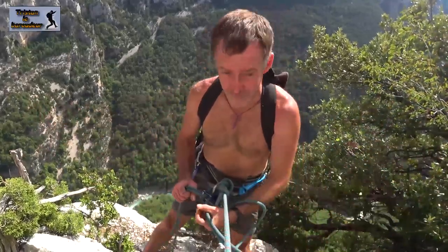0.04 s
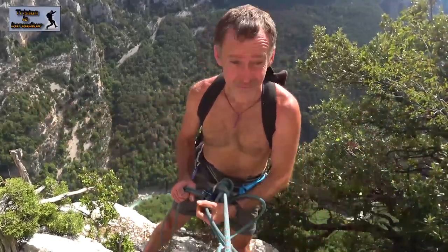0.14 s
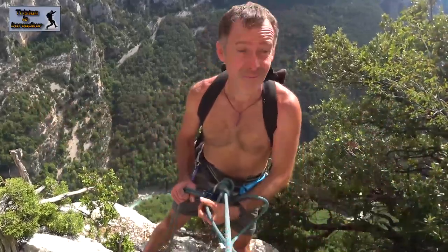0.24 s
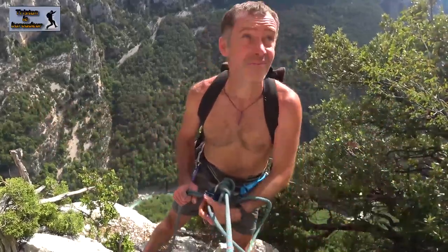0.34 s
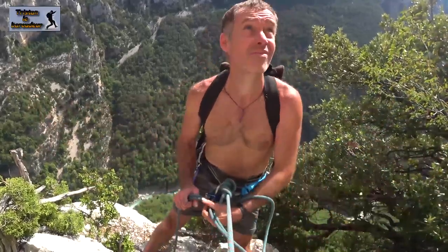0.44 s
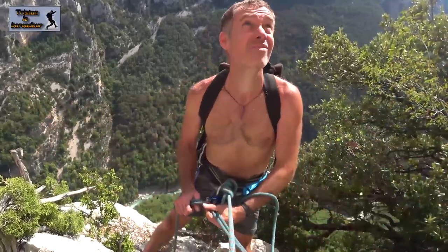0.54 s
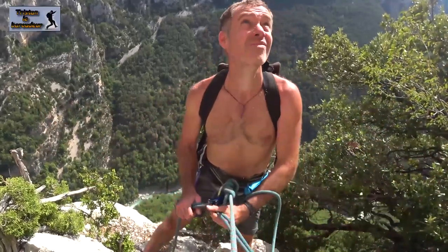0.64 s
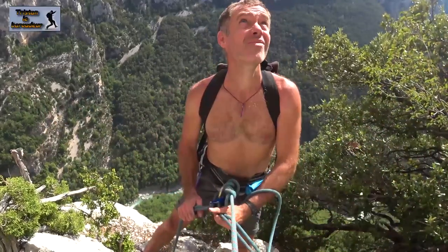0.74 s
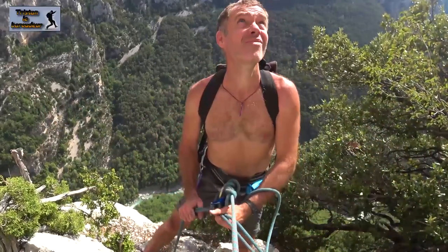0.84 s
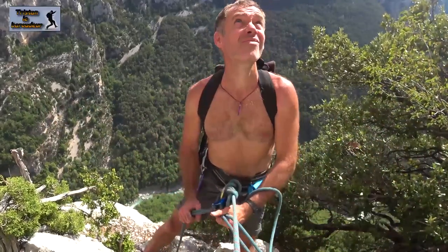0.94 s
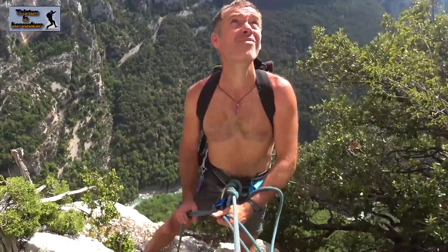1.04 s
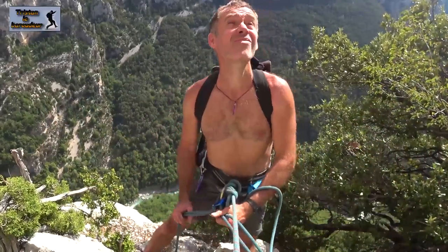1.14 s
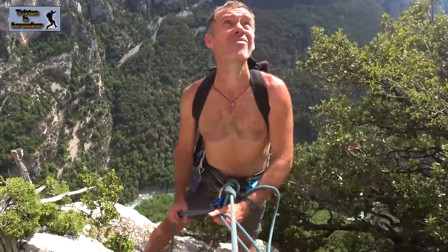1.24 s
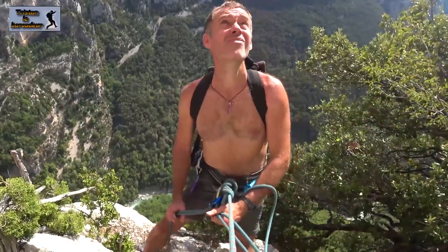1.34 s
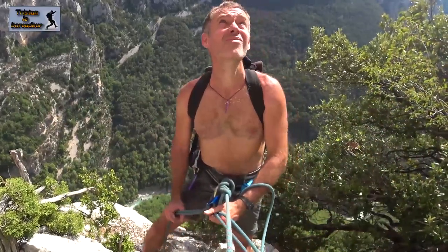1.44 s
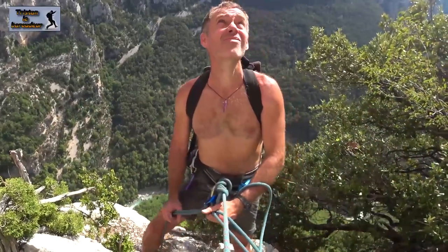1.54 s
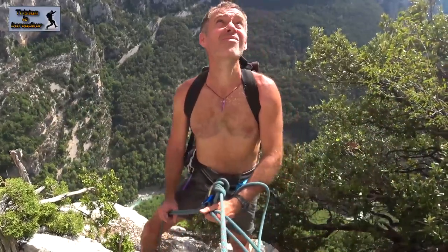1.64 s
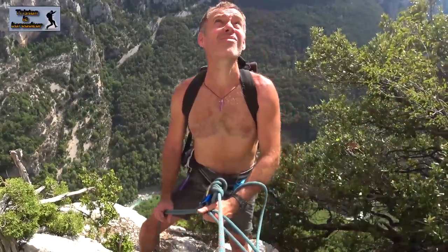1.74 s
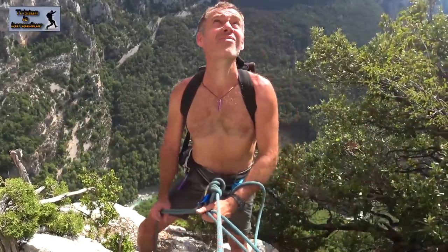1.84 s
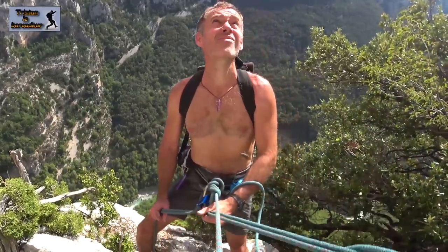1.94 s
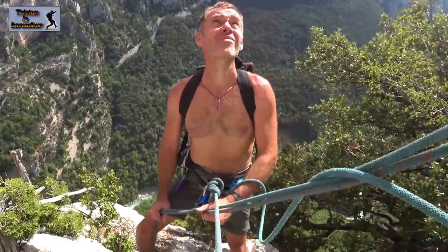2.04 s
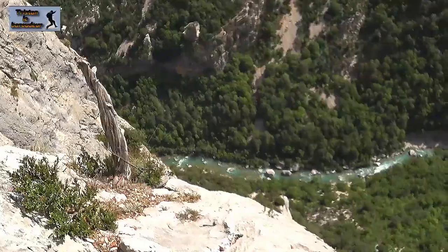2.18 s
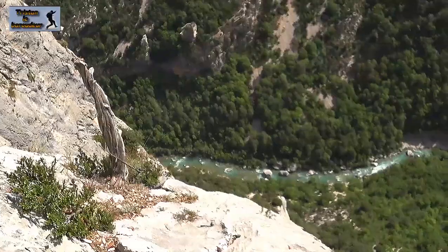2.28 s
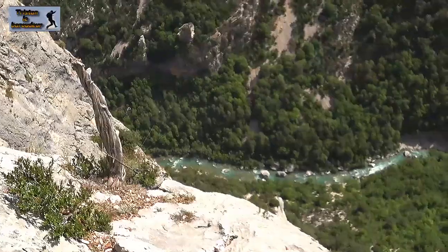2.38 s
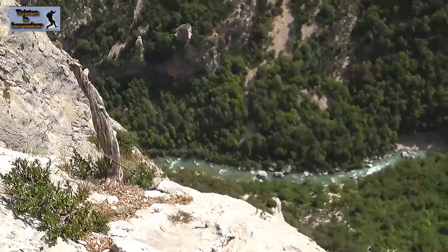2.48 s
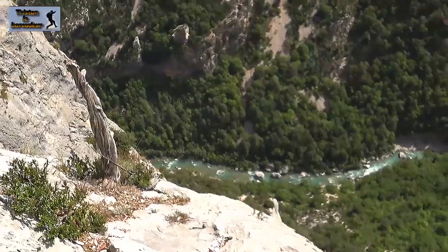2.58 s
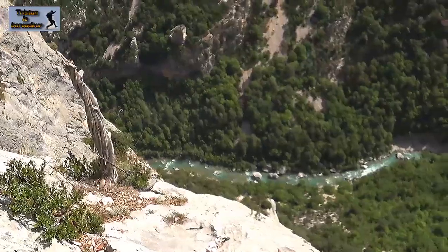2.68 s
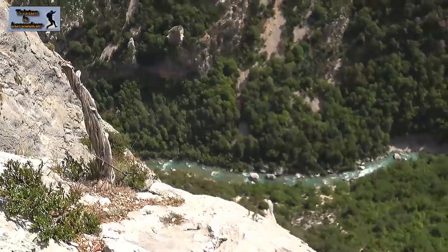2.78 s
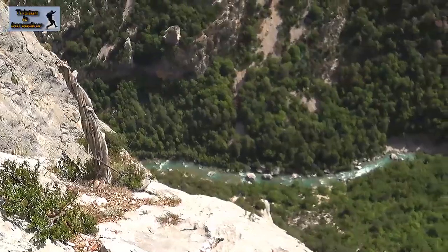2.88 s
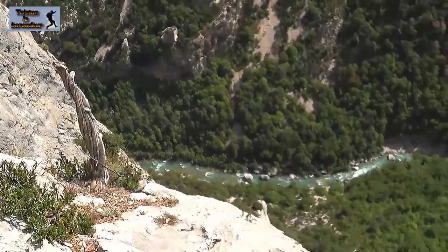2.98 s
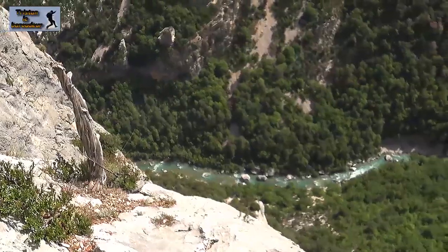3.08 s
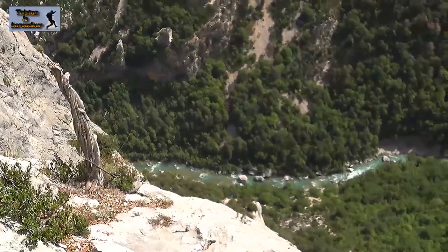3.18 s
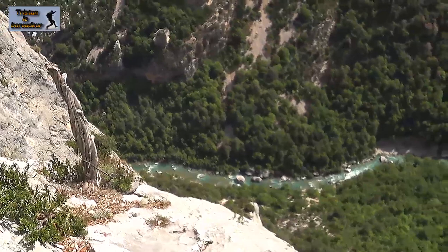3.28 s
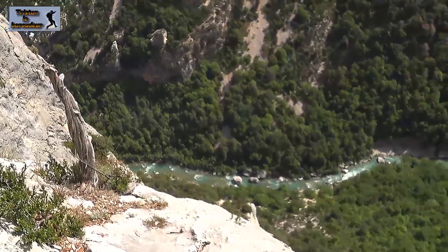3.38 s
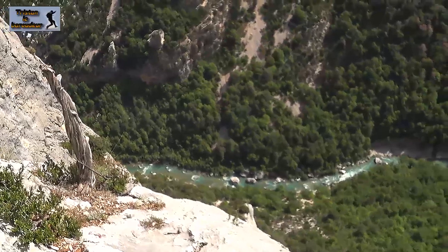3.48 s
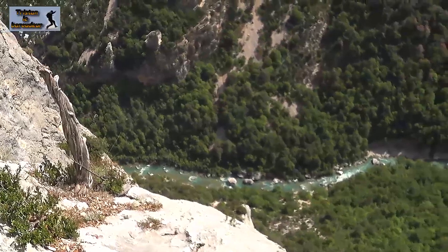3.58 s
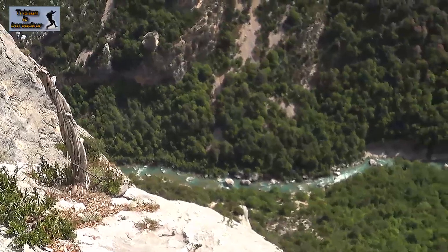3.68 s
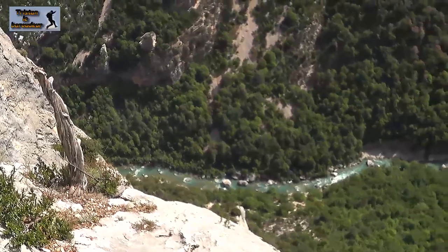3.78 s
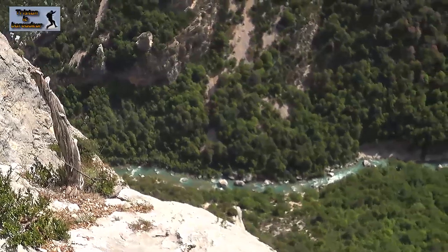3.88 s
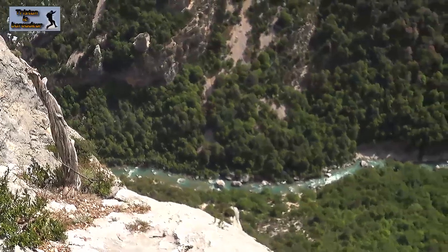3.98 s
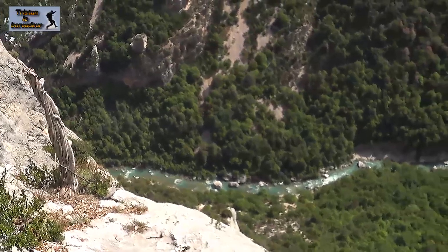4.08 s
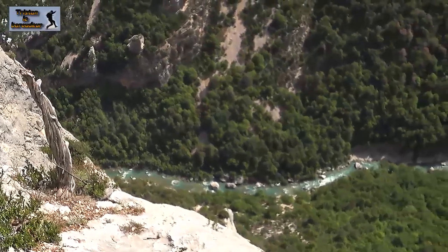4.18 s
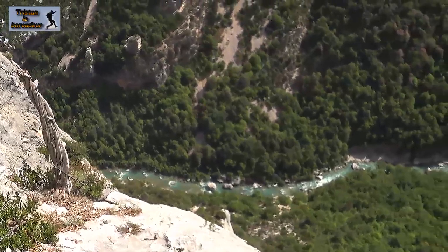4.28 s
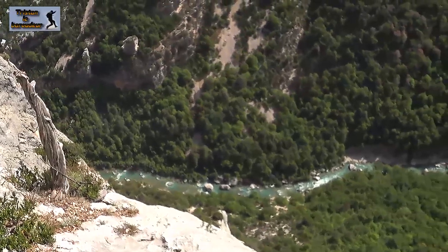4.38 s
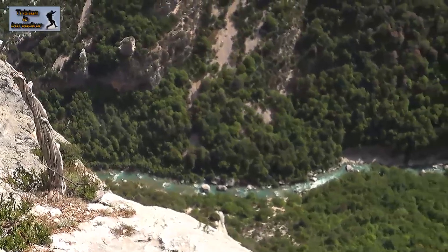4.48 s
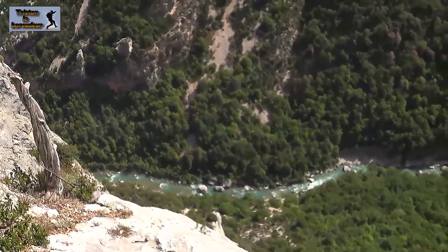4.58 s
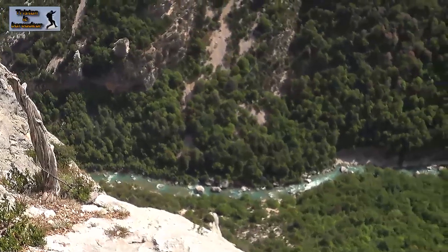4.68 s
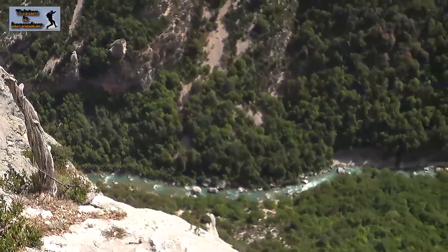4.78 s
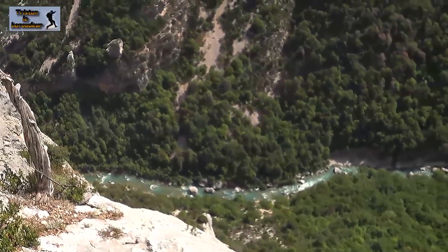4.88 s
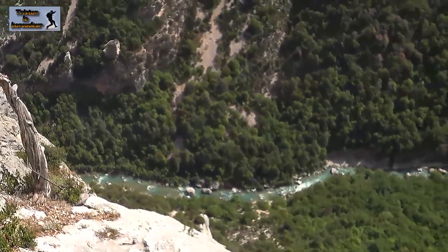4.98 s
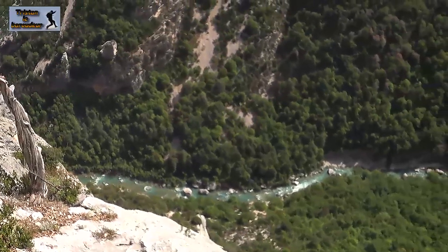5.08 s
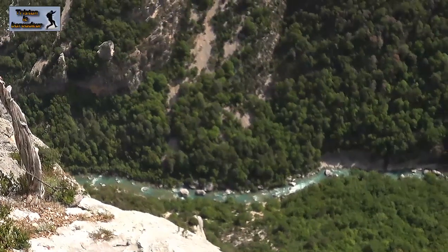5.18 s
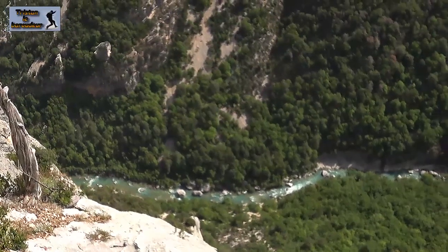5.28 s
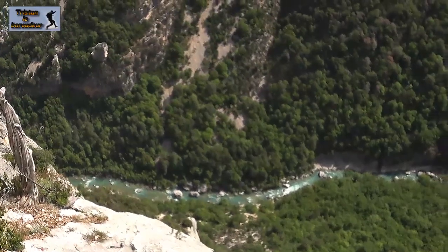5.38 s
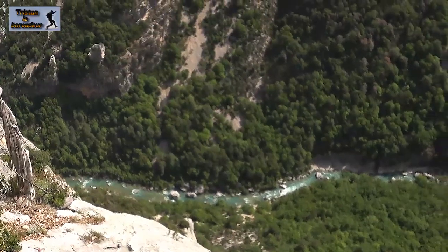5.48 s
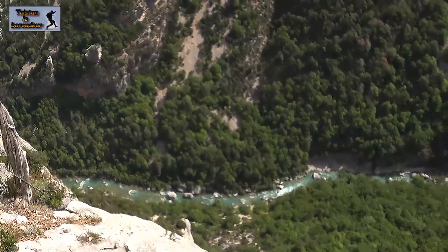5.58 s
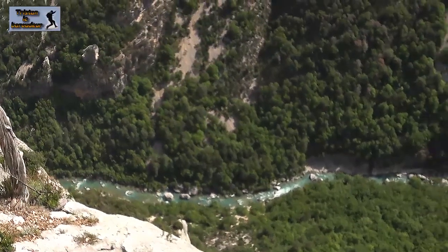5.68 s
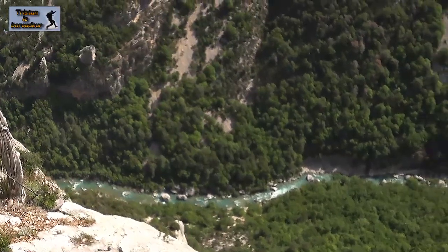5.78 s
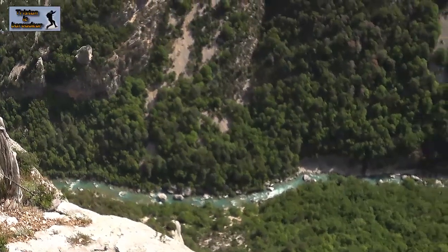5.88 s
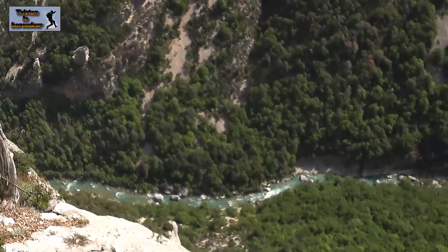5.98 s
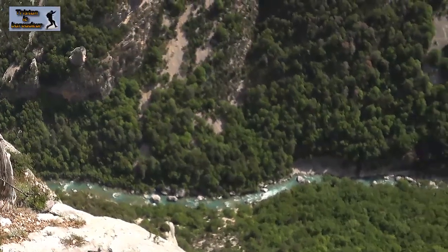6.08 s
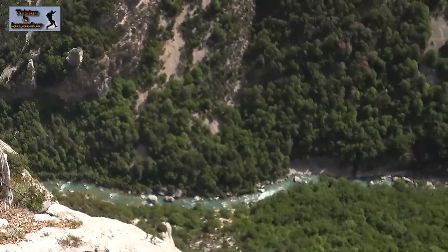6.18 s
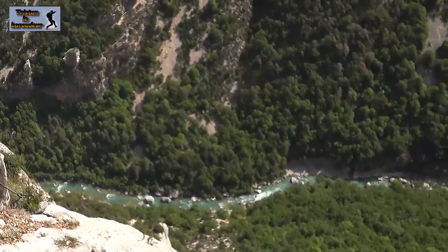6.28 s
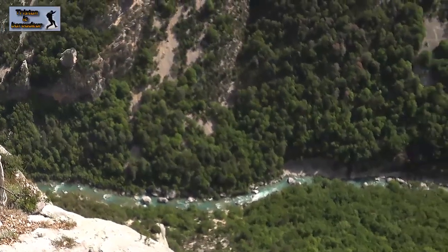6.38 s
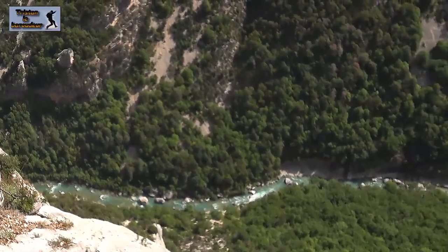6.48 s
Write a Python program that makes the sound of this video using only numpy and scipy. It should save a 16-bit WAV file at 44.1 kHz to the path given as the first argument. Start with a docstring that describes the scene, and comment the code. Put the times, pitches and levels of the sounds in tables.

```python
"""Belay above a river gorge

A climber feeds rope close to a small camera. Carabiners and other hardware knock together, damped by
rope and hands; the rope's sheath swishes with each pull, and nudges on the camera thump softly.
The river hisses far below. At a cut, its wash abruptly thins and the low rumble of air drops."""
import sys
import numpy as np
from scipy import signal
from scipy.fft import rfft, irfft
from scipy.io import wavfile

SR = 44100
rng = np.random.default_rng(int(sys.argv[2]) if len(sys.argv) > 2 else 0)


def generate_wav(signal):
    """Clip the signal to [-1, 1] and save it as 16-bit WAV at the path in sys.argv[1]."""
    frames = np.transpose(np.atleast_2d(signal))
    scaled = np.clip(frames, -1, 1) * 32767
    pcm = np.round(scaled).astype(np.int16)
    wavfile.write(sys.argv[1], SR, pcm)


N = 287884
TIME = np.arange(N) / SR
CUT_S = 2.21  # the river wash abruptly thins and the air rumble drops

# Metal meeting metal. Each row: start in seconds, piece, strength in dB,
# free ring over that strength in dB, weight of the blow in dB.
BLOWS = [ (.030, "sling clip", -51.5, 9, 8), (0.199, "sling clip", -50.5, -2, 12),
         (.3892, "quickdraw", -29, 5, -14), (0.3993, "locker", -20, 11, -5), (0.401, "locker", -14, -21, 4),
         (0.4402, "steel link", -25, 0.5, 11.5), (0.4482, "locker", -33, -19, 2),
         (.501, "buckle", -47, 2, 10), (.580, "buckle", -46.5, -11, 16),
         (0.6143, "quickdraw", -21.5, -1.5, -10), (1.651, "steel link", -40.5, 3.5, 13.5),
         (2.0352, "steel link", -36.5, -12, 14), (2.092, "locker", -23, -22, 5),
         (2.1616, "belay plate", -28, 6.5, 11), (2.2175, "anchor", -31.5, -21, 10),
         (2.312, "ring", -52.5, 7, 3), (2.367, "screw sleeve", -25.5, -19, 6), (2.378, "ring", -44, 9, 7),
         (2.4014, "screw sleeve", -19, -23, 6.5), (2.406, "screw sleeve", -30, -3, -11),
         (2.446, "nut", -29.5, 3, 4), (2.462, "anchor", -36.5, -22, 5), (2.493, "belay plate", -47, 6, 6),
         (2.658, "anchor", -32.5, -13, 10.5), (2.818, "anchor", -40.5, -18, 10),
         (2.903, "gate", -40, -15, 0), (2.916, "ring", -48, 1, 14), (3.065, "anchor", -41, -8, 10),
         (3.259, "bolt hanger", -41, -6, -4), (3.298, "bolt hanger", -44, -11, 4),
         (3.334, "belay plate", -51, 5, 12), (3.8586, "gate", -21.5, -1.5, 2),
         (3.8637, "gate", -30, -11, 4), (3.8755, "gate", -32, -4, 8.5), (3.932, "anchor", -45, -5, 17),
         (4.385, "anchor", -52, -15, 22), (4.443, "anchor", -44, -4, 3), (4.572, "anchor", -57.5, 11, 23),
         (4.91, "screw sleeve", -45, -17, 10), (5.027, "belay plate", -52, 4.5, 0),
         (5.161, "nut", -50, -14, 19), (5.18, "nut", -47, -11, 19), (5.276, "ring", -46, -24, 11),
         (6.158, "bolt hanger", -47, -14, 14), (6.167, "belay plate", -55, 11.5, 0),
         (6.395, "belay plate", -59, 12.5, 0), (6.517, "ring", -56.5, 4.5, 25), ]
def hardware(ledge_db=-22, ledge_t60=0.2):
    """Climbing gear knocks together, with a faint scatter from the rock ledge."""
    direct = np.zeros(N)
    for start, *blow in BLOWS:
        add(direct, start, strike(*blow))
    t = np.arange(SR // 3) / SR
    ledge = burst(t, ledge_t60) * (t > .005)
    scatter = signal.fftconvolve(direct, ledge / np.linalg.norm(ledge))[:N]
    return direct + amp(ledge_db) * scatter


# How each piece hangs. Each entry: rattle offset in dB, treble offset in dB.
HANGING = {"locker": (-13, -2.3), "steel link": (-13.5, 1), "sling clip": (1, 1), "quickdraw": (-8.5, -2.5),
           "belay plate": (-16, 5), "buckle": (0, -9), "ring": (2.6, -1.1), "anchor": (-3, 1),
           "bolt hanger": (0, -2), "gate": (-2, -2), "screw sleeve": (-5.5, -1.5), "nut": (-6.5, -1)}
# A second set of metal modes that sounds with the struck piece.
# Each entry: name of the mode set, its level over the piece's own ring in dB.
ADDED_RING = {"anchor": ("belay plate", 1), "bolt hanger": ("belay plate", -2), "quickdraw": ("locker", -7),
              "sling clip": ("locker", 1)}
def strike(piece, strength_db, free_db, weight_db, rattle_per_ring=0.36, top_loss_per_weight=0.25):
    """One blow: a freer piece rings and rattles more; a heavier blow stays in contact and is duller."""
    loose_db, top_db = HANGING[piece]
    ring_db = strength_db + free_db
    rattle_db = strength_db + loose_db + rattle_per_ring * free_db
    top_db -= top_loss_per_weight * weight_db
    sound = clink(piece, strength_db, ring_db, rattle_db, weight_db, top_db)
    if piece in ADDED_RING:  # ring only, no tick or rattle
        mode_set, share_db = ADDED_RING[piece]
        sound -= clink(mode_set, -np.inf, ring_db + share_db, -np.inf)
    return sound


# The modes of each piece. Each row: frequency in Hz, relative level in dB, t60 in seconds.
METAL_MODES = { "locker": [(2000, -20.5, 0.099), (2580, -9.5, 0.017), (3058, -39, 0.055), (3310, -6, 0.029),
               (3590, -2.5, 0.027), (4420, -28, 0.014), (4500, 0, 0.018), (5080, 3, 0.033),
               (5700, -9, 0.04), (6310, 5.5, 0.022), (7570, -11, .025), (8160, -7, 0.038),
               (8750, -20, 0.0492), (10800, -10.5, 0.052)], "steel link": [(1313, -9, 0.064),
               (1900, -45, 0.045), (2524, -22, 0.038), (2480, 5, 0.031), (3500, 3, 0.028), (5030, 3, 0.023),
               (5530, 0, 0.029), (6520, -15, 0.045), (7140, -5, 0.044), (8000, -4, .04), (10200, -15, .04)],
               "sling clip": [(3800, -8, .06), (5140, 33, 0.057), (5700, -27, .05), (5650, 14, .05),
               (8717, -5, .05), (9370, 2, .04), (10950, -7, 0.072), (12300, 0, .04)],
               "quickdraw": [(3600, -30, 0.1), (5200, -5, 0.023), (5500, -6, 0.031), (7060, -25, 0.04),
               (7640, -16, 0.051), (9100, -2, 0.031), (9350, -12, 0.062), (9800, 0, 0.04),
               (11070, 4, 0.033), (12150, -12, .04), (13710, -19, .06)], "belay plate": [(1820, -25, 0.044),
               (3644, -4, 0.04), (7640, -31, 0.084)], "buckle": [(3190, 5, 0.14), (3500, -14, .04),
               (3640, -9, .06), (6350, -15, .06)], "ring": [(5200, -4, 0.03), (8730, 0, 0.099),
               (10430, -7.5, 0.14), (11800, -5, 0.061), (13650, -9, .05), (15580, -8, .05)],
               "anchor": [(3700, -9, 0.1), (5290, 3, 0.15), (5270, 10, 0.067), (7200, 0, 0.092),
               (7400, -3, 0.045), (8800, -13, .05), (11690, -6, 0.086), (12050, -9, .07)],
               "bolt hanger": [(3470, -4, 0.25), (3740, -10, 0.12), (5080, -20, 0.22), (7100, -6, 0.18),
               (8840, -10, 0.046), (11300, -24, 0.087)], "gate": [(4650, -18, 0.037), (4780, -4.5, .045),
               (4900, 0, 0.045), (5070, -1, 0.056), (5330, -17, .07), (5460, -14, 0.046), (8100, -7, 0.059),
               (8130, -1.5, 0.026), (11750, -12, 0.079), (12040, -8, 0.15), (15150, -8, .04),
               (15400, -3, .04)], "screw sleeve": [(3150, -37, .04), (3880, -26, .025), (5000, -8, .02),
               (8200, -4, .045), (7940, -4, 0.039), (10400, -14, .05), (11850, -7, 0.098)],
               "nut": [(2180, -9, 0.07), (4290, 8, 0.02), (4340, -9, .04), (4930, -7, 0.025),
               (8400, -18, .03), (9650, -11, 0.09), (11700, -7, 0.1)], }
# The tone of metal in contact. Each row: frequency in Hz, gain in dB.
CONTACT_EQ = [(90, -64), (350, -23), (900, -8), (1500, -9.5), (2500, -4), (5000, -1), (8000, 0.5),
              (12000, -3), (13200, -5.5), (16000, -14)]
def clink(piece, tick_db, ring_db, rattle_db, low_db=0, top_db=0, body_db=11, body_width_hz=420):
    """A hard tick, the ringing modes of the piece, and a short dense rattle against nearby gear."""
    t = np.arange(SR // 4) / SR
    hz, db, t60 = np.transpose(METAL_MODES[piece])[:, :, None]
    strength = amp(db) / np.linalg.norm(amp(db))
    sign = np.cos(np.pi * np.arange(len(hz)))[:, None]  # alternate modes swing opposite ways
    modes = sign * strength * amp(-60 * t / t60) * np.sin(2 * np.pi * hz * t)
    ring = np.sqrt(2) * amp(ring_db) * modes.sum(0)
    tick = amp(tick_db + 5.5) * burst(t, t60=0.0073)
    rattle = amp(rattle_db + 4) * burst(t, t60=0.095)
    # heavy blows carry more lows, glancing ones more top
    weight_eq = [(2600, low_db), (4600, 0), (7500, 0), (11500, top_db)]

    def contact_db(f):
        """While the pieces touch, their modes are damped into broad humps."""
        humps = (strength / (1 + (2 * (f - hz) / body_width_hz) ** 2)).sum(0)
        body = unit(np.sqrt(1 + amp(body_db) ** 2 * humps))
        return eq_at(CONTACT_EQ, f) + eq_at(weight_eq, f) + 20 * np.log10(body)

    return ring + colour(tick + rattle, contact_db)


# Spells of swaying. Each row: start and end in seconds, piece, touches per second, ring level in dB.
SWAYS = [ (0.038, .10, "quickdraw", 60, -51), (0.461, .57, "buckle", 38, -58),
         (.65, .72, "locker", 60, -52), (2.535, 2.78, "anchor", 10, -61), (3.27, 3.42, "anchor", 26, -60),
         (3.94, 4.10, "anchor", 32, -69), (5.04, 5.12, "belay plate", 40, -62),
         (5.977, 6.45, "belay plate", 36, -59), ]
def jingles(spread_db=4):
    """Loose gear sways on its slings and touches lightly at uneven moments."""
    out = np.zeros(N)
    for start, end, piece, per_s, db in SWAYS:
        for slot in np.arange(start, end, 1 / per_s):
            level = db + spread_db * rng.uniform(-1, 1)
            onset = slot + rng.random() / per_s
            add(out, onset, clink(piece, tick_db=level - 5, ring_db=level, rattle_db=level - 5))
    return out


# The rubbing sheath. Each row: frequency in Hz, relative level in dB.
SHEATH_SPECTRUM = [(500, -26), (2000, 1), (4400, -5), (5500, -3.5), (6500, -5), (7300, -1.5), (7850, -4),
                   (8900, -7.5), (10500, -4), (12000, -7), (13000, -7.5), (16000, -18)]
# Pulls through the hands. Each row: fastest moment, rise and fall in seconds, level in dB,
# brightness of the grip in dB per octave.
ROPE_PULLS = [(.06, 0.29, .3, -45.5, -2), (.55, 0.96, 0.46, -50.5, -3), (1.1, 0.51, 1.24, -48, -1.5),
              (2.03, 0.14, 0.096, -41.5, -1.5), (2.115, 0.059, 0.12, -35.5, 1.5),
              (2.35, 0.38, 1.2, -53.5, -2.5), (2.94, 0.37, 0.24, -50, -0.5), (3.55, 1, 2.5, -57.5, -1)]
def rope(rub_db=-1.5, grain_db=1.75, grains_per_s=250, pivot_hz=7500, tilt_per_db=0.2976, even_db=-52):
    """The woven sheath rubs in fine grains, brighter as it runs faster or is gripped harder."""
    speed = movements([pull[:-1] for pull in ROPE_PULLS], rest_db=-68)  # it creeps between pulls
    grip = sum(bright * swell(*pull) ** 2 for *pull, bright in ROPE_PULLS) / speed ** 2
    db_per_octave = grip + tilt_per_db * (20 * np.log10(speed) - even_db)
    hz, t, frames = signal.stft(noise(SHEATH_SPECTRUM), SR, nperseg=256)
    octaves = np.log2(np.maximum(hz, 2000) / pivot_hz)[:, None]
    tilt = amp(octaves * np.interp(t, TIME, db_per_octave))
    rub = signal.istft(frames * tilt, SR, nperseg=256)[1][:N]
    grain = amp(grain_db * drift(grains_per_s))
    return amp(rub_db) * speed * rub * grain


# Bumps on the camera. Each row: peak time, rise and fall in seconds, level in dB.
BUMPS = [(.27, .45, .3, -47.5), (.295, 0.024, 0.031, -33.5), (.355, 0.029, .07, -38.5),
         (.93, 0.096, 0.036, -52), (1.35, 0.11, .03, -60), (2.04, 0.057, .06, -55),
         (2.165, .04, 0.034, -55)]
# The rumble of bumps and air. Each row: frequency in Hz, relative level in dB.
RUMBLE_SPECTRUM = [(20, -42), (50, -15), (80, 2.5), (120, 4.5), (220, 4), (320, -2.5), (500, -28),
                   (1200, -52), (4000, -78)]
def handling():
    """A hand nudges the camera, over light air on the microphone that drops at the cut."""
    air_db = np.where(TIME < CUT_S, -72, -83)
    return movements(BUMPS, air_db) * noise(RUMBLE_SPECTRUM)


# The river before and after the cut. Each row: frequency in Hz, relative level in dB.
FULL_WASH = [(25, -21), (100, -24.5), (165, -14.5), (235, -3), (400, -1), (800, 0.5), (1100, -1),
             (1500, -5), (2500, -9.5), (3600, -18), (5500, -23.5), (7600, -24), (9200, -27), (16000, -26.5)]
THIN_WASH = [(25, -45), (70, -38), (200, -12), (400, -4), (680, 0), (1250, -2.5), (2000, -7), (2550, -6.5),
             (3100, -16), (3650, -16), (5700, -27), (7800, -29.5), (9100, -31), (16000, -30.5)]
# Its slow swell. Each row: time in seconds, gain in dB.
RIVER_LEVEL = [(0, 1.5), (1.3, 0), (2.7, 0), (3.2, -1), (3.7, -0.5), (4.8, 1), (5.4, 0), (6.53, .5)]
def river(full_db=-44.5, thin_db=-46.5, crossfade_s=0.019, waver_db=0.35, waver_per_s=6):
    """Distant rapids: a smooth wash that swells a little on the air and thins abruptly at the cut."""
    blend = np.clip((TIME - CUT_S) / crossfade_s, 0, 1)
    full = np.sqrt(1 - blend) * amp(full_db) * noise(FULL_WASH)
    thin = np.sqrt(blend) * amp(thin_db) * noise(THIN_WASH)
    swell_db = np.interp(TIME, *np.transpose(RIVER_LEVEL))
    return (full + thin) * amp(swell_db + waver_db * drift(waver_per_s))


def burst(t, t60, rise_s=0.00008):
    """A dying burst of micro-impacts with an even spectrum."""
    fade = amp(-60 * t / t60)
    x = rng.standard_normal(len(t)) * fade
    for _ in range(3):  # flatten the spectrum, then trim the tail
        flat = irfft(np.exp(1j * np.angle(rfft(x))), len(t))
        x = flat * (fade > .001)
    x = x * np.sqrt(fade) * (1 - np.exp(-t / rise_s))
    return unit(x) * np.sqrt(np.mean(fade ** 2))


def swell(peak_s, rise_s, fall_s, db):
    """Gain of one movement: grows tenfold over rise_s, dies to a tenth over fall_s."""
    return amp(db) * 10 ** -np.maximum((peak_s - TIME) / rise_s, (TIME - peak_s) / fall_s)


def movements(rows, rest_db):
    """Joint gain of several movements over a resting level."""
    return np.sqrt(amp(rest_db) ** 2 + sum(swell(*row) ** 2 for row in rows))


def noise(spectrum):
    """Noise of rms 1 with the given spectrum."""
    gain = amp(eq_at(spectrum, np.fft.rfftfreq(N, 1 / SR)))
    return unit(irfft(rfft(rng.standard_normal(N)) * gain, N))


def drift(per_s):
    """A random wander of rms 1, rolling off above per_s."""
    return noise([(0, 0), (per_s, 0), (2 * per_s, -40), (SR, -200)])


def colour(x, db_at, size=512):
    """Causal filter with the gain db_at(Hz), so attacks stay sharp."""
    log_gain = np.log(amp(db_at(abs(np.fft.fftfreq(size, 1 / SR)))))
    minimum_phase = np.exp(np.conj(signal.hilbert(log_gain)))
    return signal.fftconvolve(x, np.fft.ifft(minimum_phase).real)[:len(x)]


def eq_at(points, hz):
    """A curve's dB at hz, on a log-frequency axis."""
    f, db = np.transpose(points)
    return np.interp(np.log(hz + 1), np.log(f + 1), db)


def add(mix, start_s, sound):
    """Mixes a sound in at start_s."""
    part = mix[max(round(start_s * SR), 0):][:len(sound)]
    part += sound[:len(part)]


def amp(db):
    """Decibels to gain."""
    return 10 ** (np.asarray(db) / 20)


def unit(x):
    """Scales to rms 1."""
    return x / np.sqrt(np.mean(x ** 2) + 1e-20)


def scene():
    """Everything at the one microphone."""
    return (river() + rope() + handling() + hardware() + jingles())[None]


def record(dry, low_cut_hz=40, top_hz=15900):
    """The camera's low cut against wind, then its band limit."""
    low_cut = signal.butter(2, low_cut_hz, "highpass", fs=SR, output="sos")
    band_limit = signal.firwin(401, top_hz, window=("kaiser", 8), fs=SR)
    return signal.oaconvolve(signal.sosfilt(low_cut, dry), band_limit[None], "same")


dry = scene()
out = record(dry)
generate_wav(out)
```